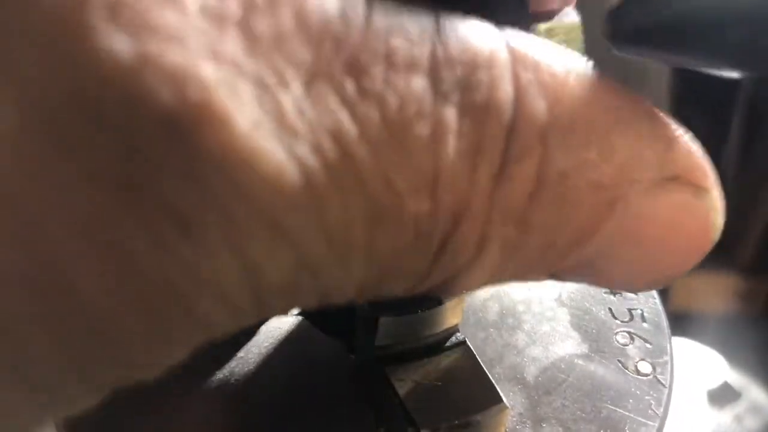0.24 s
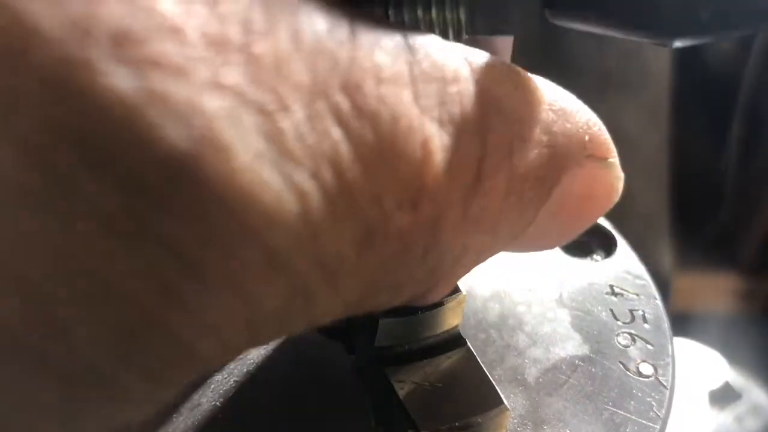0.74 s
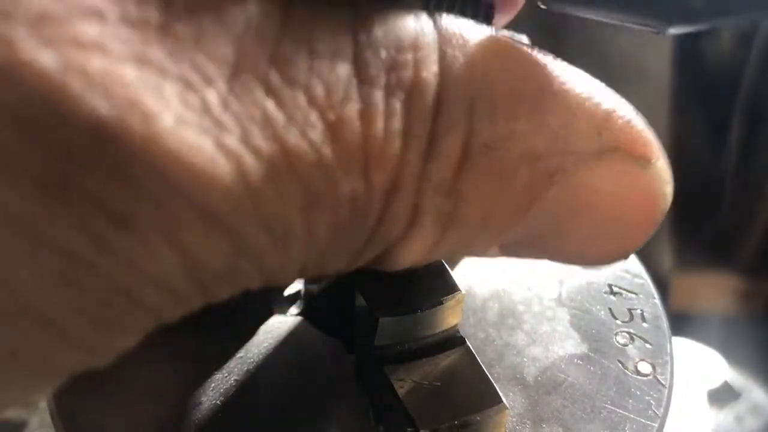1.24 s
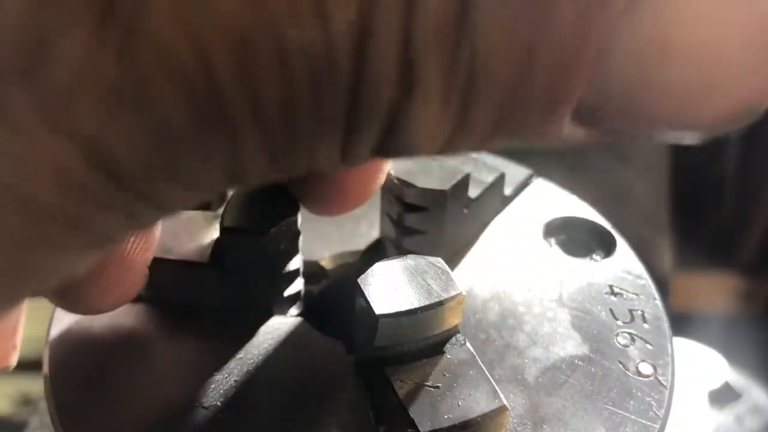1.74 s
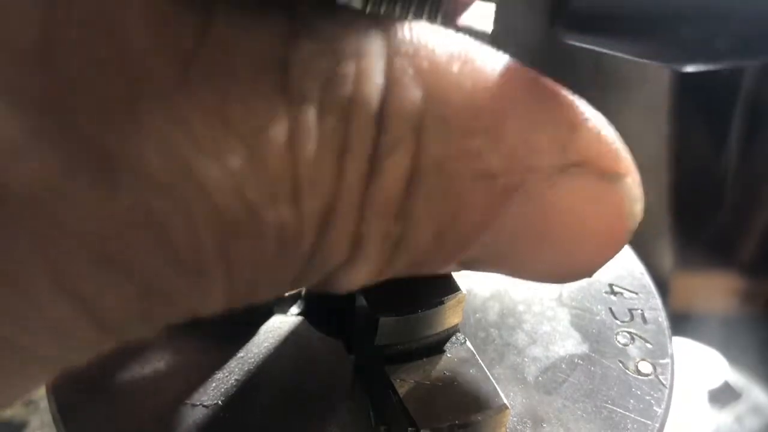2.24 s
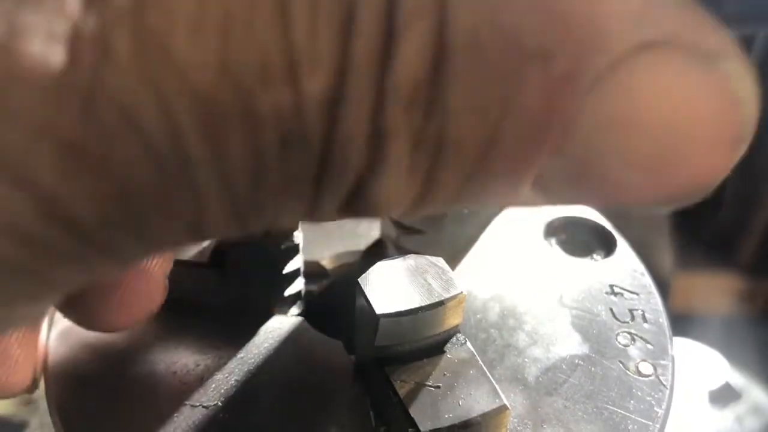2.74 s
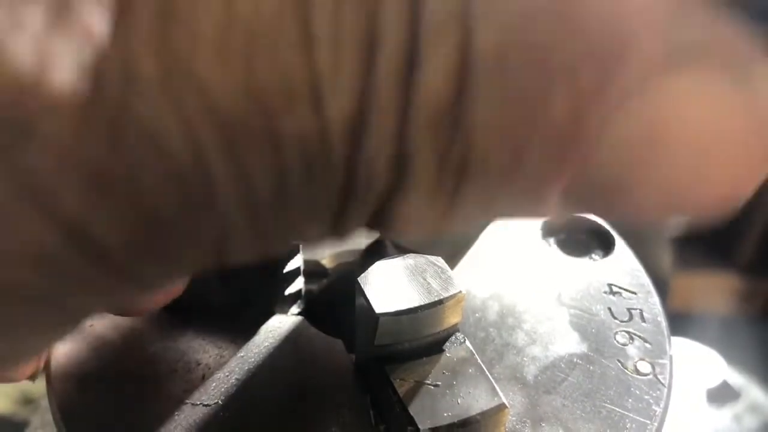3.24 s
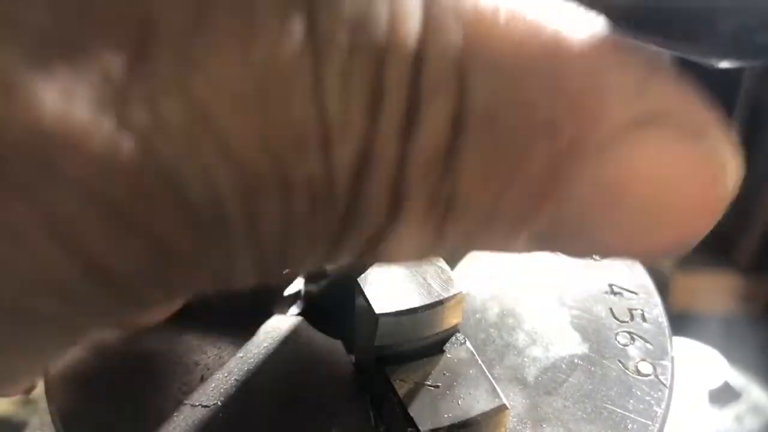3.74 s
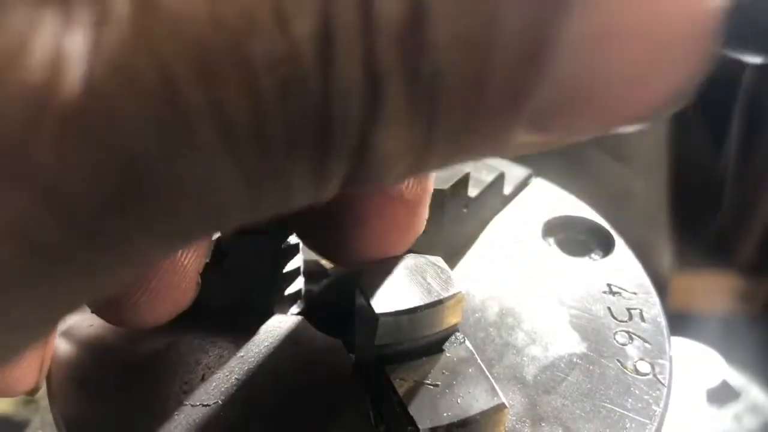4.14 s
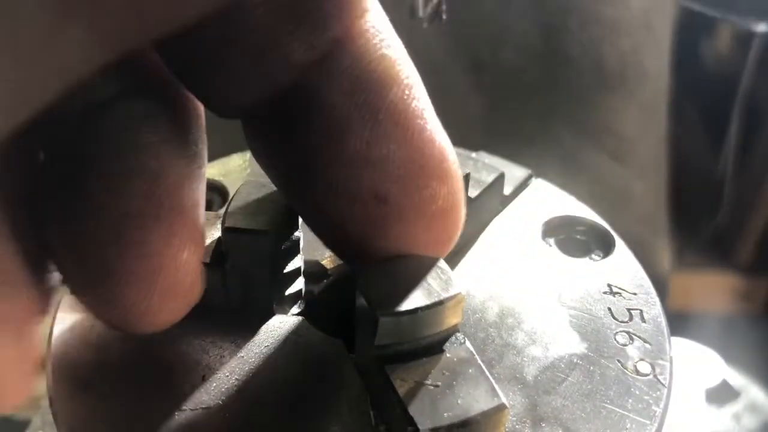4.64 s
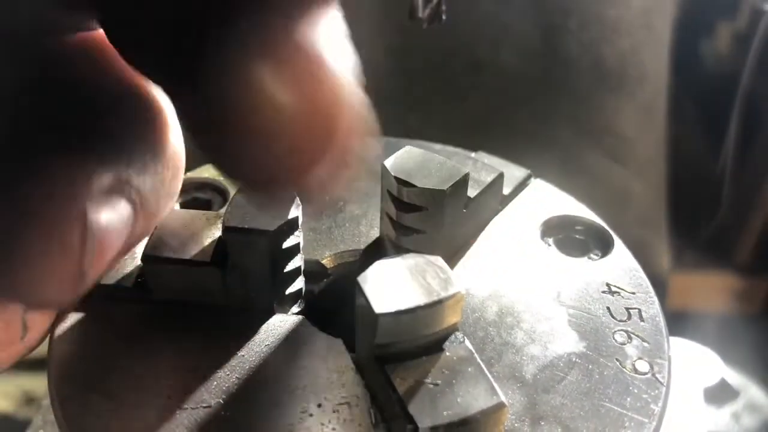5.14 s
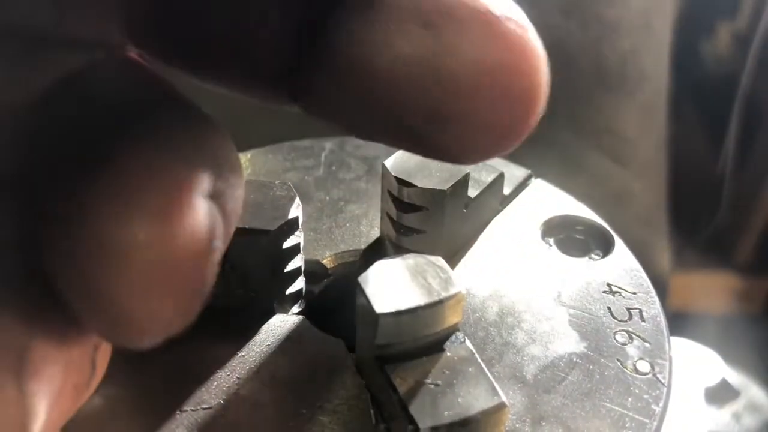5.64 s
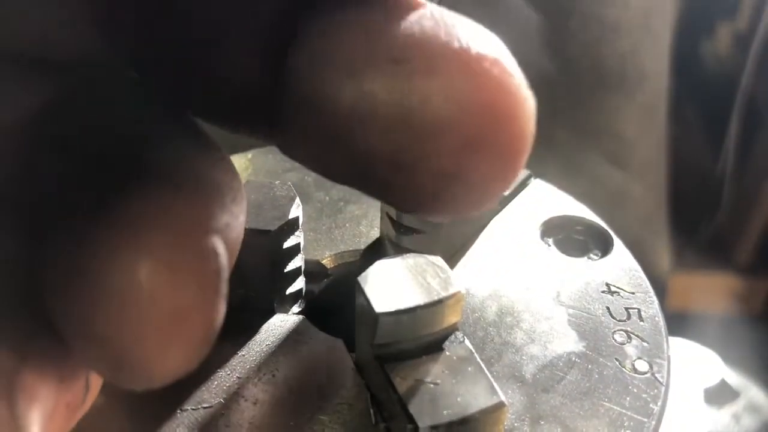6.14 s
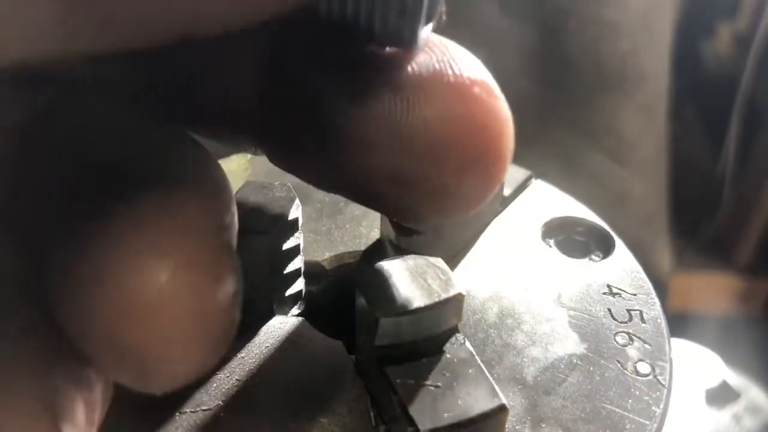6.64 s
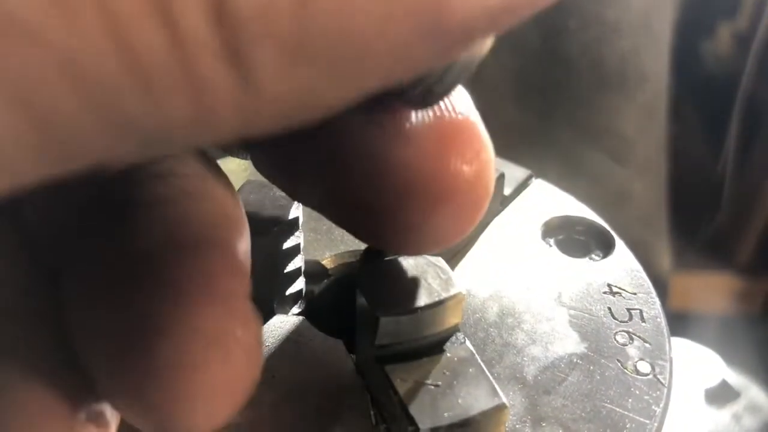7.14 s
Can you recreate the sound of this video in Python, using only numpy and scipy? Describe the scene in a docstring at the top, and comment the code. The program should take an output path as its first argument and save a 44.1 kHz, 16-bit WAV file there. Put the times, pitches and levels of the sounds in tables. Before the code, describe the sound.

Close blow-gun air jet in a workshop: smooth hiss, fluttering resonant blasts over steel with microphone buffeting, abrupt stop, low fan drone and finger clicks.

```python
"""A compressed-air blow gun close to a mono phone in a workshop: a free hiss of jet, then the jet swept over
a steel chuck, whose bore, jaws, face and rim each ring as resonant bands of noise, with whistles at the edges.
Spilt air buffets the microphone as low, lumpy noise with a few falling pops. When the trigger lets go, a short
tail dies into the noise and hum of a shop fan, with small metal ticks from the fingers at work."""
import sys
import numpy as np
from scipy import signal
from scipy.fft import rfft, irfft, next_fast_len
from scipy.io import wavfile
from scipy.ndimage import uniform_filter1d, map_coordinates

SR = 44100
rng = np.random.default_rng(int(sys.argv[2]) if len(sys.argv) > 2 else 0)


def file_out(sig):
    """Save sig as 16-bit WAV at sys.argv[1]."""
    # one column per channel
    cols = np.atleast_2d(sig).T
    # limit, then scale
    lim = np.clip(cols, -1, 1)
    pcm = np.round(lim * 32767).astype(np.int16)
    wavfile.write(sys.argv[1], SR, pcm)


N = 324999
TIME = np.arange(N) / SR  # s
SIZE = next_fast_len(N)
FREQ = np.maximum(np.arange(SIZE // 2 + 1) * SR / SIZE, 1)  # Hz, kept above zero for the logs

# Spectrum of the jet in open air: f/Hz, relative density/dB
FREE_COLOUR = [(18, -42), (30, -39), (141, -9), (508, 0.5), (1090, -3.5), (1410, -5.5), (1570, -5),
               (2640, -5), (5650, -4.5), (13100, -8), (15700, -9)]
# Steady spill of air on the microphone, before its random lumps: t/s, level/dB
SPILL = [(0, -68), (.2, -51), (1.0, -45), (1.04, -70), (1.3, -64), (1.85, -69), (2.0, -53), (3.2, -46.5),
         (4.5, -48.5), (5.3, -52), (6.2, -50.5)]
# Gusts on the microphone: middle t/s, length/s, deep rumble level/dB, upper thump level/dB
GUSTS = [(1.362, 0.11, -36.5, -49), (1.47, 0.13, -37, -46), (1.914, .14, -42, -51), (2.202, .06, -34, -25),
         (2.265, 0.11, -27.5, -22.5), (2.398, 0.095, -40, -43), (2.541, .04, -23.5, -28),
         (3.432, 0.079, -39, -37), (3.562, 0.036, -32, -40), (3.616, 0.059, -31, -32),
         (4.294, 0.25, -31.5, -40), (5.326, 0.043, -36, -43), (5.42, 0.18, -34, -36),
         (5.696, 0.13, -44, -36), (5.997, 0.19, -30, -34.5), (6.163, 0.25, -36.5, -52)]
# Single eddies that slap the microphone port: t/s, peak level/dB, starting f/Hz
POPS = [(2.534, -16.5, 335), (3.414, -23, 253), (3.554, -19, 220), (3.61, -18, 282)]
# Level of the fan noise in the background, rising after the gun stops: t/s, level/dB
SHOP_LEVEL = [(6.4, -50.5), (6.588, -48.5), (6.85, -47.5), (7.37, -41.5)]
# Spectrum of the fan's air noise: f/Hz, relative density/dB
FAN_COLOUR = [(25, -39.5), (75, -8.5), (130, -12.5), (194, -6), (260, -15), (450, -18.5), (1060, -25),
              (3860, -35), (5500, -43), (7000, -48.5), (9000, -58.5), (15700, -68)]
# Resonances of the fan hum: f/Hz, width/Hz, relative level/dB
FAN_HUM = [(185, 34, -11.5), (94.6, 18, -6), (550, 40, 1), (3750, 350, -20)]
# What the jet points at: t/s, target [0 bore, 1 jaw, 2 face, 3 rim]
AIM = [(1.0, 0), (3.15, 0), (3.22, 1), (3.6, 1), (3.66, 0), (4.15, 0), (4.2, 1), (4.3, 1), (4.45, 2),
       (5.5, 2), (5.6, 3)]
# Air resonances of the chuck bore: f/Hz, width/Hz, relative level/dB
BORE_MODES = [(1615, 600, 4.5), (1900, 450, -0.5), (2270, 120, 3.5), (3135, 850, -1.5), (4020, 1000, -0.5),
              (4430, 350, -10), (4820, 350, -2.5), (5500, 700, 3.5), (6500, 440, -3.5), (7010, 870, -1),
              (8280, 410, -0.5), (9000, 550, -1), (10400, 790, -5.5), (11370, 500, -8.5), (13300, 650, -12),
              (15200, 600, -8.5)]
# Air resonances at a jaw: f/Hz, width/Hz, relative level/dB
JAW_MODES = [(1604, 860, 3), (2290, 500, 2.5), (3380, 1200, 5), (4100, 670, 5), (4970, 430, -6.5),
             (5510, 590, -2.5), (6200, 280, -4), (6980, 620, -6), (8330, 900, -16.5), (11600, 560, -15.5),
             (14370, 494, -8.5)]
# Air resonances at the chuck face: f/Hz, width/Hz, relative level/dB
FACE_MODES = [(1606, 620, -0.5), (2290, 370, -2.5), (3230, 1600, -17), (4810, 1600, -1), (5990, 700, 4),
              (7300, 1360, 3), (8100, 400, -7), (9330, 590, -1.5), (9900, 530, -4.5)]
# Air resonances at the rim: f/Hz, width/Hz, relative level/dB
RIM_MODES = [(1630, 800, 0.5), (2340, 380, -2.5), (3230, 1200, 4), (4020, 800, -1), (4660, 1080, 5.5),
             (5940, 1500, 5.5), (7400, 1000, 6.5), (8900, 1600, 2), (11100, 700, 4.5), (12600, 1000, -4.5),
             (15300, 800, -5)]
# Resonances of the low roar: f/Hz, width/Hz, relative level/dB
ROAR_MODES = [(466, 960, -0.5), (850, 790, 4.5)]
# Spectrum of the nozzle hiss: f/Hz, relative density/dB
NOZZLE_COLOUR = [(300, -35), (1300, -16.5), (3500, -10.5), (7000, -3), (10000, -1.5), (12300, -4.5),
                 (15700, -4)]
# Bands that echoes off the hand and steel cancel: f/Hz, width/Hz, gain at centre/dB
NOTCHES = [(1357, 340, -4.5), (2726, 380, -0.5), (4620, 100, -3), (7870, 230, -4), (9900, 1200, -2.5)]
# Jet on the chuck, before the target balance: t/s, shrill ring level/dB, deep ring against it level/dB
JET_LEVELS = [(1.0, -39, -5), (1.03, -40, 5.5), (1.1, -31, -1), (1.22, -38, 2), (1.28, -34.5, -12.5),
              (1.34, -40.5, -6), (1.54, -37.5, -11), (1.6, -24, 1.5), (1.82, -22.5, -1.5), (1.95, -29, -5),
              (2.11, -27, -7), (2.2, -33, -6), (2.25, -26.5, -7.5), (2.3, -31, -3.5), (2.5, -22, -11),
              (2.53, -22.5, -2), (2.56, -25.5, -10), (2.59, -15.5, -7.5), (2.62, -23, -6.5),
              (2.68, -18, -2.5), (2.71, -15.5, -3), (2.91, -16.5, -4), (2.96, -27, -9.5), (3.01, -27.5, -6),
              (3.06, -16, -9), (3.1, -14, -1.5), (3.14, -21, -4.5), (3.2, -18.5, -10), (3.26, -22, -4.5),
              (3.32, -22, -7), (3.63, -22.5, -4), (3.67, -15, -6.5), (3.71, -13.5, -5), (3.98, -24, -5.5),
              (4.05, -15, -9.5), (4.11, -16, -13), (4.18, -26, -1), (4.3, -19, -7), (4.39, -15, -6),
              (4.63, -12, -15), (5.31, -14.5, -11.5), (5.49, -13, -19), (5.63, -15.5, -12.5),
              (6.11, -13, -14.5), (6.18, -15.5, -16.5), (6.2, -16.5, -4), (6.23, -26, -4.5),
              (6.24, -40, -12)]
# Balance, one row each for bore, jaw, face, rim:
# shrill ring level/dB, middle ring level/dB, deep ring level/dB, low roar level/dB, nozzle hiss level/dB
BALANCES = [(-2, -5, -0.5, -7.5, -3.5), (-2, -5.5, 0, -6, 0), (-2, -7, -0.5, -7, -3),
            (-2.5, -5, -0.5, -6, -1.5)]
# Low roar against its usual share: t/s, level/dB
ROAR_SWELL = [(1.0, 1), (1.26, 4.5), (1.29, 18), (1.312, 10), (1.325, -2), (1.55, 3), (1.7, -4), (1.8, 4),
              (1.95, 1.5), (2.65, -1), (2.78, 2), (2.9, -2), (3.1, 0.5), (3.3, -1.5), (3.8, -2), (4.1, -1),
              (4.5, 2.5), (4.65, 0.5), (5.55, -1.5), (5.68, 2.5), (5.93, -3), (6.06, 1.5), (6.24, -2.5)]
# Slow change of colour as the hand moves: t/s, middle ring level/dB, nozzle hiss level/dB
HAND_COLOUR = [(1.0, 1, -2), (1.3, 2, 1), (1.6, -0.5, 1.5), (1.9, -0.5, -1.5), (2.15, 1, -2.5),
               (2.3, 0, 3.5), (2.5, 0, -0.5), (2.85, -2, 0.5), (3.35, -1.5, -0.5), (3.7, -1, -1.5),
               (4.1, -0.5, 2), (4.43, 1.5, 1.5), (4.7, -3, -1.5), (5.1, 1.5, 0), (5.27, 4, 1.5),
               (5.45, -4, 1), (5.6, -0.5, 1), (6.24, -0.5, 0.5)]
# Treble reflected by the hand: mean delay/s, gain [linear]
HAND_ECHOES = [(.0021, .2), (.0034, .16)]
# Whistles of the jet on an edge: t/s, length/s, from f/Hz, to f/Hz, rate of wavering/Hz, level/dB
WHISTLES = [(4.395, 0.056, 3500, 3500, 500, -21), (4.525, 0.098, 3280, 2920, 500, -22),
            (5.251, 0.0438, 3150, 3540, 500, -16.5), (5.418, 0.11, 7200, 9160, 1400, -11.5),
            (6.116, 0.1, 7000, 7460, 1400, -12.5)]
# Ticks of metal in the fingers: t/s, overall level/dB, nominal f/Hz, crack T60/s, ring against it level/dB
TICKS = [(6.6322, -44.5, 11100, 0.012, -34), (6.734, -46, 5500, 0.019, -30), (6.7805, -47, 4000, .02, -1),
         (6.7944, -49, 3500, .02, -14), (6.806, -34, 1800, 0.03, -10), (6.9035, -49, 6950, .025, -28),
         (6.9144, -59.5, 11500, .03, -7), (7.2795, -47, 4970, .3, -9), (7.3073, -29, 3600, 0.13, -14),
         (7.3165, -41, 11500, 0.08, -18)]
# Metal modes shared by the ticks: f/Hz, T60/s
TICK_MODES = [(2400, .04), (3300, 0.046), (5050, .12), (9600, .1), (11500, .07), (13700, .1)]

FREE_DB, FREE_RISE_DB_PER_S = -20.5, 0.5
FREE_OPENS_S, FREE_OPENING_DB, FREE_STOPS_S = 0.16, -3.5, 1.008
ROOM_T60_S, ROOM_TREBLE_T60_S, ROOM_DB = 0.53, 0.31, -19.5
SPILL_THUMP_DB, RUMBLE_LAG_S = 3.5, 0.01
POP_T60_S, POP_SAG_S = 0.066, 0.015  # a pop's pitch halves in the sag time
DEEP_TOP_HZ, MIDDLE_TOP_HZ = 2650, 4420  # limits of the deep and middle ring
MIDDLE_FOLLOWS_DEEP, ROAR_FOLLOWS_DEEP = 0.52, 0.9  # dB for each dB that the deep ring gains
HISS_FOLLOWS_JET, JET_MEAN_DB = 0.9, -25.5  # the nozzle hiss swings less than the ring
SHIMMER_DB = 1.3  # each ring swells and fades a little on its own
TOP_HZ = 16150  # upper limit of the phone


def undb(db):
    """Turn dB into amplitude."""
    return 10 ** (np.asarray(db) / 20)


def curve(s, value):
    """Join points in time by straight lines."""
    return np.interp(TIME, s, value)


def noise(gain, count=N):
    """Noise of rms 1, shaped by the given gain at each frequency."""
    x = irfft(rfft(rng.standard_normal(SIZE)) * gain, SIZE)[:count]
    return x / x.std()


def coloured(points):
    """Gain of (Hz, dB) points joined on a log frequency axis."""
    hz, db = np.transpose(points)
    return undb(np.interp(np.log(FREQ), np.log(hz), db))


def ringing(modes):
    """Gain of resonances driven by turbulence; powers add, skirts are steep."""
    power = 0
    for hz, width_hz, db in modes:
        detuning = (FREQ - hz ** 2 / FREQ) / width_hz
        power = power + undb(2 * db) / (1 + detuning ** 2) ** 2
    return np.sqrt(power)


def walk(rate):
    """Random levels held 1 / rate s and slewed twice; rms spread 1."""
    hold = int(SR / rate)
    steps = np.repeat(rng.standard_normal(N // hold + 1), hold)
    w = uniform_filter1d(uniform_filter1d(steps, hold), hold)[:N]
    return w / w.std()


def free_jet():
    """Smooth broad hiss of the jet in open air; the valve opens fully after a moment and is cut off sharply."""
    level_db = FREE_DB + FREE_RISE_DB_PER_S * TIME + FREE_OPENING_DB * (TIME < FREE_OPENS_S)
    flutter_db = 0.9 * walk(60)
    return (TIME < FREE_STOPS_S) * undb(level_db + flutter_db) * noise(coloured(FREE_COLOUR))


def room(x):
    """Diffuse tail of the shop, as decaying noise; the treble dies sooner."""
    t = TIME[:SR]
    low = noise(coloured([(200, -3), (3500, 0), (6000, -6), (10000, -30)]), count=SR)
    high = noise(coloured([(3000, -14), (7000, 0), (15000, -3)]), count=SR)
    tail = low * undb(-60 * t / ROOM_T60_S) + high * undb(6.5 - 60 * t / ROOM_TREBLE_T60_S)
    unit_tail = tail / np.sqrt(np.sum(tail ** 2))
    return undb(ROOM_DB) * signal.fftconvolve(x, unit_tail)[:N]


def gust_swell(middle_s, length_s):
    """Rise and fall of one gust, a squared cosine."""
    return np.cos(np.pi * np.clip((TIME - middle_s) / length_s, -0.5, 0.5)) ** 2


def buffet():
    """Eddies shake the microphone port in lumps: thumps in gusts, a rumble just behind, a few falling pops."""
    spill = undb(curve(*np.transpose(SPILL)) + 5.5 * walk(14))
    rumble, thump = spill, spill * undb(SPILL_THUMP_DB)
    for s, length, rumble_db, thump_db in GUSTS:
        rumble = rumble + undb(rumble_db) * gust_swell(s + RUMBLE_LAG_S, length)
        thump = thump + undb(thump_db) * gust_swell(s, length)
    # bands: f/Hz, width/Hz, relative level/dB
    deep = rumble * noise(ringing([(80, 100, 0)]))
    upper = thump * noise(ringing([(170, 160, 0), (290, 180, -4)]))
    fade = np.clip((6.28 - TIME) / 0.052, 0, 1)  # silent from 6.28 s
    out = fade * undb(1.6 * walk(60)) * (deep + upper)
    for s, db, hz in POPS:
        t = np.maximum(TIME - s, 0)
        cycles = hz * POP_SAG_S * np.log1p(t / POP_SAG_S)
        out = out - undb(db - 60 * t / POP_T60_S) * np.sin(2 * np.pi * cycles)
    return out


def shop():
    """Fan in the background: broad air noise with a wavering hum of resonant noise."""
    air = undb(0.6 * walk(7.4)) * noise(coloured(FAN_COLOUR))
    hum = undb(-12 + 2.2 * walk(13)) * noise(ringing(FAN_HUM))
    return undb(curve(*np.transpose(SHOP_LEVEL))) * (air + hum)


def drift(x):
    """The ring wanders a percent or two in pitch as the hand shifts: a varying delay."""
    return map_coordinates(x, [(TIME + 0.002 * walk(4)) * SR], order=3)


def moving_echoes(x):
    """The shifting hand reflects the treble a few ms late, so a fine ripple drifts through the hiss."""
    treble = signal.sosfilt(signal.butter(2, 3000, "high", fs=SR, output="sos"), x)
    out = x
    for delay_s, gain in HAND_ECHOES:
        late = TIME - delay_s * (1 + 0.05 * walk(4))
        out = out + gain * map_coordinates(treble, [late * SR], order=2)
    return out


def chuck_jet():
    """The jet drives the air pockets of whatever it points at; all flutter with the turbulence."""
    s, level_db, deep_db = np.transpose(JET_LEVELS)
    aim = curve(*np.transpose(AIM))
    follows_deep = (0, MIDDLE_FOLLOWS_DEEP, 1, ROAR_FOLLOWS_DEEP, 0)
    gains = []
    for follow, target_db in zip(follows_deep, np.transpose(BALANCES)):
        balance_db = np.interp(aim, range(4), target_db)
        gains.append(undb(curve(s, level_db + follow * deep_db) + balance_db))
    shrill, middle, deep, roar, hiss = gains

    roar = roar * undb(curve(*np.transpose(ROAR_SWELL)))
    hiss = hiss * undb((HISS_FOLLOWS_JET - 1) * curve(s, level_db - JET_MEAN_DB))
    slow_s, middle_db, hiss_db = np.transpose(HAND_COLOUR)
    middle = middle * undb(curve(slow_s, middle_db))
    hiss = hiss * undb(curve(slow_s, hiss_db))

    notch = undb(sum(db * np.exp(-((FREQ - hz) / width) ** 2) for hz, width, db in NOTCHES))
    out = roar * noise(notch * ringing(ROAR_MODES)) + hiss * noise(notch * coloured(NOZZLE_COLOUR))
    bands = ((deep, 0, DEEP_TOP_HZ), (middle, DEEP_TOP_HZ, MIDDLE_TOP_HZ), (shrill, MIDDLE_TOP_HZ, SR))
    for target, modes in enumerate((BORE_MODES, JAW_MODES, FACE_MODES, RIM_MODES)):
        share = np.sqrt(np.clip(1 - abs(aim - target), 0, 1))  # equal-power crossfade
        for gain, low_hz, high_hz in bands:
            band_modes = [m for m in modes if low_hz < m[0] < high_hz]
            shimmer = undb(SHIMMER_DB * walk(9))
            out += share * gain * shimmer * noise(notch * ringing(band_modes))
    valve = (TIME > s[0]) * np.clip((6.236 - TIME) / 0.013, 0, 1)  # shut at 6.236 s
    flutter = undb(0.95 * walk(40))
    return moving_echoes(drift(out) * valve * flutter)


def whistles():
    """Narrow wavering noise that glides while the jet crosses an edge: a tone multiplied by slow noise."""
    out = np.zeros(N)
    for s, length, from_hz, to_hz, waver_hz, db in WHISTLES:
        progress = np.clip((TIME - s) / length, 0, 1)
        phase = 2 * np.pi * np.cumsum(from_hz + (to_hz - from_hz) * progress) / SR
        out += undb(db) * np.sin(np.pi * progress) * walk(waver_hz) * np.sin(phase)
    return out


def ticks():
    """Each tick is a dying crack of noise; the metal modes nearest its nominal pitch ring on."""
    out, t = np.zeros(N + SR // 2), TIME[:SR // 2]
    for s, db, hz, crack_t60, ring_db in TICKS:
        edges = [hz / 4, min(1.6 * hz, SR / 2.2)]
        band = signal.butter(2, edges, "band", fs=SR, output="sos")
        grit = signal.sosfilt(band, rng.standard_normal(len(t)))
        crack = 0.77 * grit * undb(-60 * t / crack_t60)
        ring = 0
        for mode_hz, mode_t60 in TICK_MODES:
            mode_db = ring_db - 60 * abs(np.log2(mode_hz / hz))  # 60 dB weaker per octave away
            ring = ring + undb(mode_db - 60 * t / mode_t60) * np.sin(2 * np.pi * mode_hz * t)
        at = int(s * SR)
        out[at:at + len(t)] += undb(db) * (crack + ring)
    return out[:N]


def scene():
    """Gun and ticks excite the room; wind on the microphone and the shop fan stay dry; both channels match."""
    near = free_jet() + chuck_jet() + whistles() + ticks()
    mono = near + room(near) + buffet() + shop()
    return np.array([mono, mono])


def record(dry):
    """The phone drops the deepest bass, rounds the peaks and cuts the top."""
    x = signal.sosfilt(signal.butter(2, 45, "high", fs=SR, output="sos"), dry)
    rounded = np.tanh(0.9 * x) / 0.9
    return signal.sosfilt(signal.cheby2(24, 90, TOP_HZ, fs=SR, output="sos"), rounded)


dry = scene()
out = record(dry)
file_out(out)
```